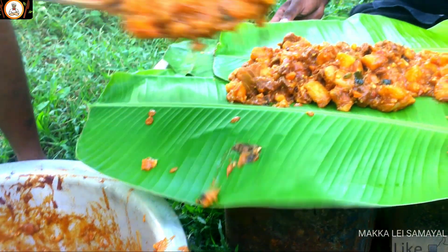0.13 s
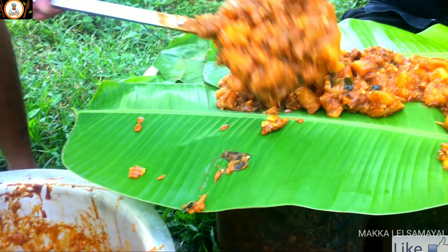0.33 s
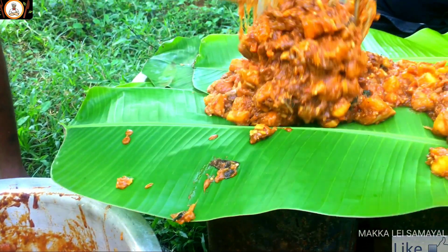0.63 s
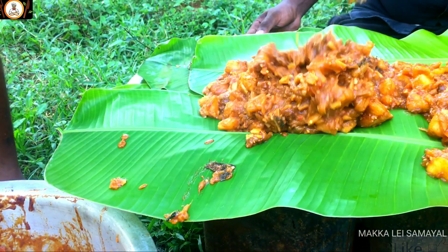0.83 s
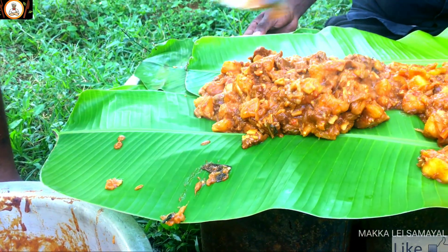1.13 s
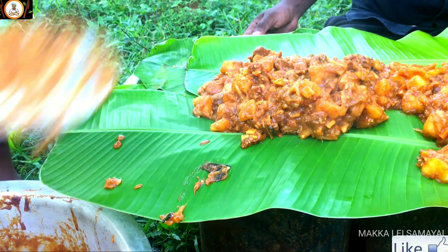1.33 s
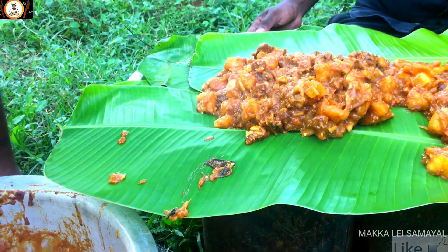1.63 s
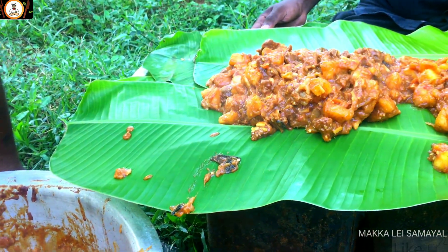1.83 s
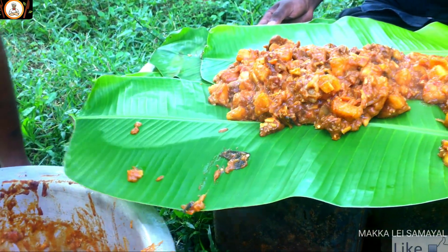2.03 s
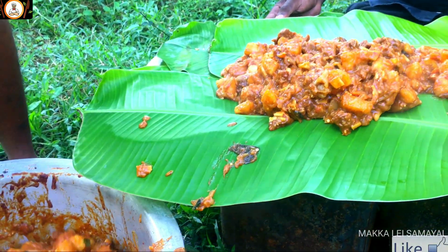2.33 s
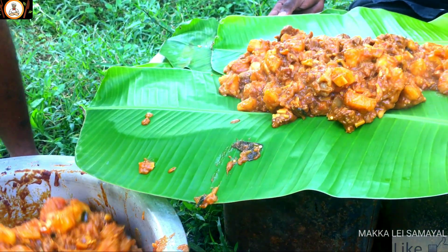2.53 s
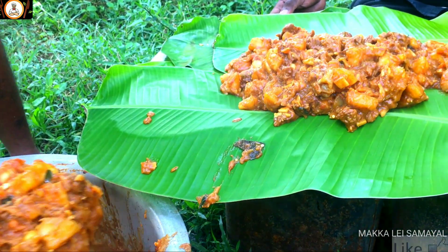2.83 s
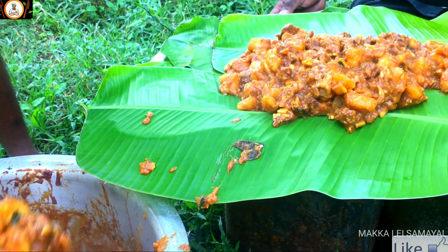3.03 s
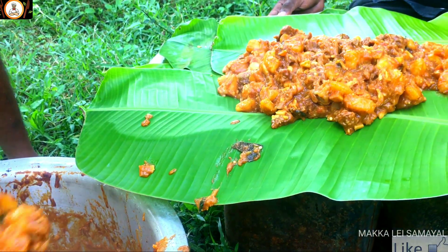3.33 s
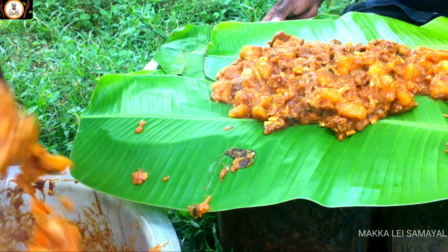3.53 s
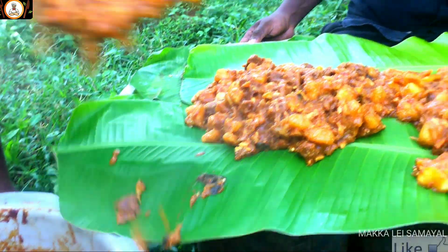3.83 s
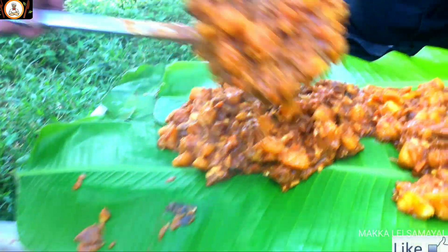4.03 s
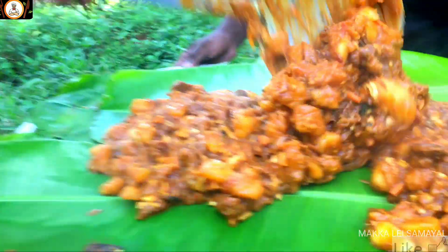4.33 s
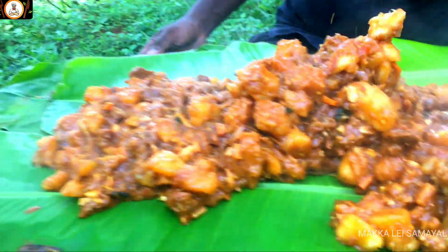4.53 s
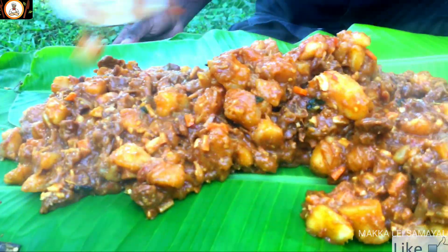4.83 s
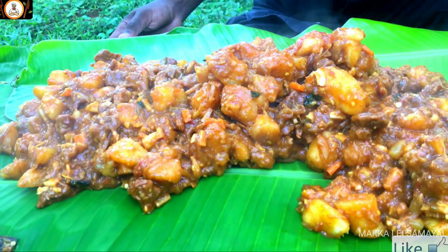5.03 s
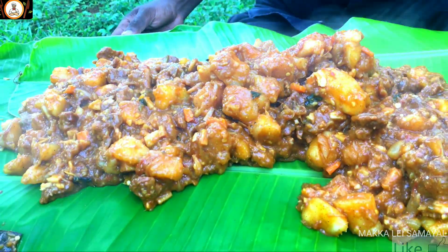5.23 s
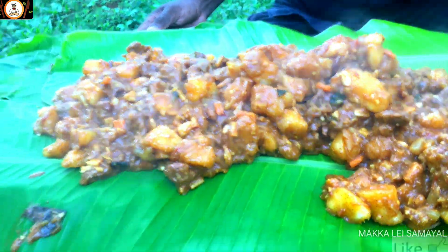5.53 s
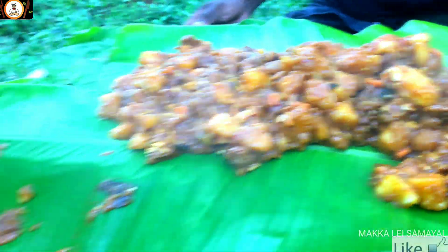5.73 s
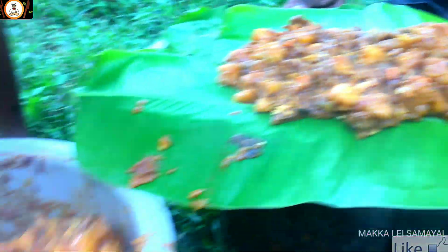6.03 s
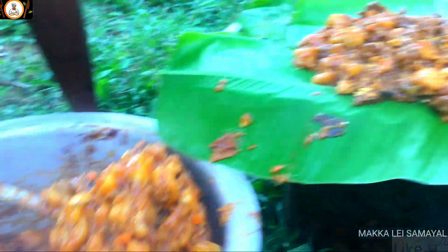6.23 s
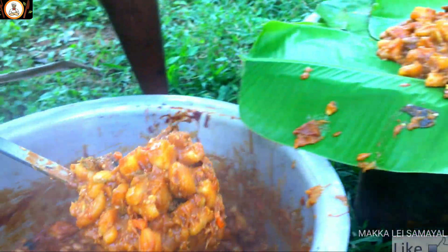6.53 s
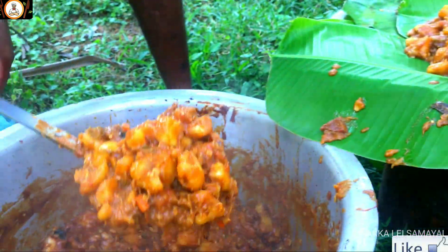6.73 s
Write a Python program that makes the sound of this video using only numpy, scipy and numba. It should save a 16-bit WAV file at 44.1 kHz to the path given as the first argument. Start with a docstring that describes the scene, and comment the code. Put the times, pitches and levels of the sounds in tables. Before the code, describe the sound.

A metal ladle digs into thick curry in a big aluminium pot with a short ringing scrape, ending in a loud, dull knock. The sticky food smacks and crackles quietly, then flops softly onto a leaf. A second, harsher scrape follows near the end, closing with a lighter knock. The sound is close and dry, outdoors, over a low rumble, a distant engine hum and a thin insect chirp.

```python
"""A long metal ladle digs twice through thick curry in a big aluminium pot, outdoors.
Each scoop is two pushes: the edge slips along the wall, ringing wall and bowl, and ends in a knock
that the food damps. The sticky mass smacks and crackles as films tear and bubbles burst, and flops
softly onto a leaf. Behind it: a low rumble, a far engine's hum and a thin insect note."""
import sys
import numpy as np
from scipy import signal
from scipy.fft import rfft, irfft, next_fast_len
from scipy.io import wavfile
from numba import njit

SR = 44100
rng = np.random.default_rng(int(sys.argv[2]) if len(sys.argv) > 2 else 0)


def log_audio(samples):
    """Write samples as a 16-bit WAV file to the path given in sys.argv[1]."""
    # one column per channel
    frames = np.atleast_2d(samples).T
    # limit to full scale, then quantise
    limited = np.clip(frames, -1, 1)
    pcm = np.round(limited * 32767).astype(np.int16)
    wavfile.write(sys.argv[1], SR, pcm)


N = 303849
TIME_S = np.arange(N) / SR

# open-air spectrum: (frequency [Hz], gain [dB])
AIR_SPECTRUM = [(15, -35.5), (25, -13.5), (55, -1), (153, -11), (195, -14.5), (256, -21), (405, -26.5),
                (695, -28), (1480, -32.5), (2280, -31), (2910, -37.5), (3160, -31.5), (4490, -36.5),
                (12500, -47), (16000, -62.5)]
# far engine's run: (time [s], firing rate [Hz], level [dB])
ENGINE_RUN = [(0, 27.8, -50.5), (1, 27.4, -51.5), (2.3, 25.66, -57), (3.1, 24.95, -51.5), (4, 23.8, -64),
              (4.7, 23.6, -51.5), (6.89, 25, -60.5)]
# engine lines: (multiple of the firing rate, gain [dB])
ENGINE_HARMONICS = [(2, 0.5), (3, -8.5), (4, -0.5), (5, -8), (6, -3.5), (7, -13)]
# lumps landing: (time [s], level [dB], upper edge [Hz], length [s])
LUMP_FLOPS = [(0.192, -47.5, 880, 0.044), (0.281, -50.5, 990, 0.033), (3.878, -40, 895, .035),
              (3.921, -38.5, 880, 0.016), (4.362, -49.5, 510, 0.011), (4.394, -44.5, 266, 0.063),
              (4.491, -48, 304, 0.048), (4.582, -50.5, 477, 0.059), (5.883, -47, 410, 0.065)]
# wet mass shifting: (peak time [s], crackle [dB], half length [s], sizzle [dB])
MASS_SHIFTS = [(.62, -65, .25, -78), (1.82, -61, .1, -81), (2.521, -55, .13, -71.5), (2.73, -56, .05, -56),
               (2.975, -58, .09, -70.5), (3.598, -66, .3, -81), (4.032, -59.5, .06, -66),
               (4.324, -60, .09, -68), (4.481, -56.5, .07, -57.5), (6.115, -57, .12, -78),
               (6.54, -57.5, .05, -77.5)]
# clearest air pockets bursting: (time [s], relative level [dB], centre [Hz])
POCKET_POPS = [(0.022, -36.5, 2040), (0.3362, -40.5, 2960), (0.48, -36.5, 1820), (.4906, -32, 1255),
               (.5137, -38.5, 7500), (0.734, -39.5, 8750), (0.7545, -36.5, 4860), (.857, -41.5, 3770),
               (1.382, -42.5, 3330), (2.345, -35, 12600), (2.5195, -34.5, 4180), (2.5462, -37.5, 5900),
               (2.623, -33, 3470), (2.6307, -32, 3340), (2.9554, -31.5, 3320), (3.324, -35.5, 3640),
               (3.393, -36.5, 2300), (3.544, -34, 4120), (5.559, -31.5, 1260), (5.931, -38, 4250),
               (6.1574, -31, 3750), (6.1833, -33, 2610), (6.238, -35.5, 6060), (6.2897, -35.5, 4350),
               (6.4807, -31.5, 4200), (6.551, -31, 1890), (6.7298, -37, 3550), (6.841, -37, 1810)]
# sticky smacks: (time [s], relative level [dB], nominal centre [Hz], t60 [s], relative low part [dB])
FILM_SMACKS = [(3.4448, -22.5, 2376, 0.02, -10), (3.4662, -23, 5730, 0.045, -1),
               (3.5672, -14.5, 4870, 0.037, -14), (3.6187, -20.5, 5830, 0.025, -21),
               (3.6239, -17.5, 2700, 0.027, -6), (3.7131, -24, 3900, 0.086, 5),
               (3.7239, -20.5, 7800, 0.053, 5.5), (3.8066, -20.5, 2100, 0.05, -11),
               (3.9235, -27.5, 3160, 0.09, -14)]
# loaded pot's modes: (frequency [Hz], gain [dB], t60 [s])
POT_MODES = [(254.8, -8.5, 0.094), (289, -4.5, 0.067), (410, -0.5, 0.03), (565, -1.5, 0.047),
             (780, -12, .04), (932, -12, .045), (1223, -13.5, 0.037), (1444, -18, 0.0401),
             (1920, -18.5, .035), (2335, -17, 0.027)]
# ladle hits: (time [s], level [dB], struck spot [Hz], spot t60 [s], whole pot [dB], crack [dB])
POT_KNOCKS = [(0.2705, -16, 1060, 0.0098, -22, -21.5), (0.2763, -27, 950, 0.013, -16.5, -11),
              (1.8498, -5.5, 1850, 0.0057, -19, -26), (1.8523, -19, 1790, 0.041, 2.5, -9),
              (2.283, 4.5, 582, 0.031, -13.5, -25.5), (2.334, -28, 565, 0.032, -15, -19),
              (3.249, -21.5, 270, 0.065, -18, -21), (3.2495, -29, 613, 0.033, -24, -36),
              (3.331, -39.5, 273, 0.11, -13, -31), (3.626, -41, 269, 0.12, -7, -20),
              (3.926, -29, 562, 0.056, -10, -13), (5.584, -24.5, 280, 0.054, -5, 1.5),
              (5.8632, -13.5, 265, 0.025, -0.5, -33), (6.2300, -48.5, 300, 0.047, 0, -23.5),
              (6.518, -34.5, 280, 0.12, -5.5, -27)]
# ladle edge's modes: (frequency [Hz], waver [Hz], gain [dB])
EDGE_MODES = [(3114, 196, 7.5), (4100, 134, 7.5)]
# edge catching: (time [s], level [dB], length [s])
EDGE_CATCHES = [(2.1638, -17.5, 0.0021), (5.672, -21, 0.0051), (5.731, -28, 0.01)]
# rubbing spectrum: (frequency [Hz], gain [dB])
RUB_SPECTRUM = [(88, -42), (150, -15), (205, -7.5), (275, 0.5), (361, -13.5), (649, 2.5), (1060, -14),
                (1190, -1), (1830, -2), (2020, -8), (2220, 0), (3220, -6), (14500, -26.5), (16000, -35.5)]
# wall modes under the ladle, per scoop: (frequency [Hz], width [Hz], gain [dB])
FIRST_WALL_MODES = [(668, 87, 2), (1122, 57, -7), (1820, 130, -6.5), (2476, 76, 0), (3062, 81, -4.5),
                    (3730, 84, -0.5), (4160, 180, 0.5), (5750, 600, -1.5), (6950, 99, -4.5),
                    (8500, 350, -11)]
SECOND_WALL_MODES = [(900, 180, 0), (1890, 88, -1), (2182, 39.4, 2), (2643, 35, -15), (3090, 180, 3),
                     (3454, 37, 8.5), (4380, 440, 2), (5210, 76, 2.5), (5570, 39, 3), (6110, 160, 1)]
# ladle pushes: (time [s], length [s], attack [s], release t60 [s], full-pressure grind [dB], swell [dB],
# treble [dB], bowl start [Hz], full-pressure bowl [Hz], bowl share [dB], scoop)
LADLE_PUSHES = [(1.907, 0.086, 0.081, 0.3, -30.5, 1, -42.5, 1240, 1190, -3.5, "first"),
                (2.018, 0.23, 0.044, 0.09, -27.5, 6, -42, 2016, 4440, -3, "first"),
                (5.576, 0.2307, 0.0065, 0.046, -22, 13.5, -38.5, 1200, 4530, -6, "second"),
                (5.834, .025, .007, 0.049, -24, 1, -46, 2960, 2170, -1.5, "second")]


def undb(db):
    """Decibels to gain."""
    return 10 ** (np.asarray(db) / 20)


def unit(x):
    """Scale to rms 1."""
    return x / np.sqrt(np.mean(x ** 2) + 1e-18)


def add(track, at_s, sound):
    """Mix a sound into the track."""
    start = max(int(at_s * SR), 0)
    track[start:start + len(sound)] += sound[:N - start]


def fade(t, t60_s):
    """Exponential decay, 60 dB down after t60_s."""
    return np.exp(-np.log(1000) * t / max(t60_s, .002))


def bump(at_s, half_s):
    """Gaussian swell peaking at at_s."""
    return np.exp(-((TIME_S - at_s) / half_s) ** 2)


def walk(rate_hz, size):
    """Random drift, spread near 1."""
    knots = np.arange(size) * rate_hz / SR
    return np.interp(knots, np.arange(4096), rng.standard_normal(4096))


def grains(size, rate_hz, spread_db):
    """Random clicks, a few much stronger than the rest."""
    fires = rng.random(size) < rate_hz / SR
    strength = np.minimum(rng.exponential(size=size), 4)
    return fires * rng.choice([-1, 1], size) * undb(spread_db * strength)


def band(x, hz, width_hz):
    """One resonance, gain 1 at its centre."""
    hz = min(hz, .42 * SR)
    return signal.lfilter(*signal.iirpeak(hz, hz / min(width_hz, SR / 3), fs=SR), x)


@njit
def glide(x, hz, width_hz):
    """Resonance with per-sample centre and width."""
    y, state, low = np.empty(len(x)), 0., 0.
    for i in range(len(x)):
        g = np.tan(np.pi * min(hz[i] / SR, .45))
        damping = width_hz[i] / hz[i]
        ring = (state + g * (x[i] - low)) / (1 + g * (g + damping))
        state, low = 2 * ring - state, low + 2 * g * ring
        y[i] = damping * ring
    return y


def between(x, low_hz, high_hz, order=2):
    """Band-pass between two edges."""
    return signal.sosfilt(signal.butter(order, [low_hz, high_hz], "band", fs=SR, output="sos"), x)


def colour(x, spectrum):
    """Filter by a table of (frequency [Hz], gain [dB])."""
    hz, db = np.transpose(spectrum)
    size = next_fast_len(len(x))
    bins_hz = np.maximum(np.arange(size // 2 + 1) * SR / size, 1)
    gain = undb(np.interp(np.log(bins_hz), np.log(hz), db))
    return irfft(rfft(x, size) * gain, size)[:len(x)]


def split(x):
    """Body, middle and treble, in phase, each at rms 1."""
    body, below = (signal.sosfiltfilt(signal.butter(3, hz, fs=SR, output="sos"), x)
                   for hz in (1000, 7000))
    return unit(body), unit(below - body), unit(x - below)


def open_air(level_db=-50, lull_s=5.27, lull_db=-6.5):
    """Distant hiss over a rumble that ebbs once."""
    air = unit(colour(rng.standard_normal(N), AIR_SPECTRUM)) * undb(level_db)
    air = signal.sosfilt(signal.butter(4, 35, "high", fs=SR, output="sos"), air)
    rumble = signal.sosfiltfilt(signal.butter(2, 220, fs=SR, output="sos"), air)
    hiss = air - rumble
    return hiss + rumble * undb(-.05 + lull_db * bump(lull_s, half_s=.5))


def engine():
    """A far engine hums on low harmonics, each wavering by itself."""
    times_s, firing_hz, level_db = np.transpose(ENGINE_RUN)
    phase = 2 * np.pi * np.cumsum(np.interp(TIME_S, times_s, firing_hz)) / SR
    hum = sum(undb(db + 4.2 * walk(2.1, N)) * np.sin(k * phase + .5 * walk(2.5, N))
              for k, db in ENGINE_HARMONICS)
    return unit(hum) * undb(np.interp(TIME_S, times_s, level_db))


def insect(hz=3150, width_hz=130, period_s=.358, jitter_s=.015, chirp_db=-67, trill_db=-81):
    """A far insect: brief, near-even chirps over a faint trill."""
    note = unit(band(band(rng.standard_normal(N), hz, width_hz), hz, width_hz))
    times_s = np.arange(.235, N / SR, period_s)
    scatter = rng.standard_normal((len(times_s), 2))
    chirps = sum(undb(chirp_db + 2 * loud) * bump(at_s + jitter_s * late, half_s=.024)
                 for at_s, (loud, late) in zip(times_s, scatter))
    return note * (chirps + undb(trill_db + 5 * walk(9, N)))


def flops():
    """Soft lumps land: a dull patter swells and dies."""
    out, t = np.zeros(N), np.arange(SR // 3) / SR
    for at_s, db, edge_hz, length_s in LUMP_FLOPS:
        age = 3 * t / length_s
        patter = unit(between(grains(len(t), 2500, 2.8), 97, edge_hz))
        add(out, at_s, undb(db) * patter * age * np.exp(1 - age))
    return out


def unrest(rest_db=-70):
    """Food motion as a gain: the hot mass never quite settles and swells at each shift."""
    shift_power = sum((undb(db) * bump(at_s, half_s)) ** 2 for at_s, db, half_s, _ in MASS_SHIFTS)
    return np.sqrt(undb(rest_db) ** 2 + shift_power)


def fizz(mist_db=-4):
    """Tiny bubbles burst over a wet hiss; gravy sizzles as it peels off the metal."""
    bubbles = sum(unit(band(grains(N, 30, 4.2), hz, .14 * hz)) for hz in np.geomspace(1800, 12500, 12))
    mist = unit(between(grains(N, 4000, 2.2), 2100, 12000, order=1))
    peeling = sum(undb(db) * bump(at_s, half_s) for at_s, _, half_s, db in MASS_SHIFTS)
    sizzle = unit(between(grains(N, 2500, 2), 9500, 17000)) * peeling
    return (unit(bubbles) + undb(mist_db) * mist) * unrest() + sizzle


def tear(size, snap_db):
    """A sticky film gives way: one snap, then tiny clicks."""
    clicks = unit(grains(size, 7000, 2.8))
    clicks[0] += undb(snap_db)
    return clicks


def faint_pops(rate_hz=3, db=-40, centre_hz=3800):
    """Random rows like POCKET_POPS, crowding where the food moves."""
    moved = np.cumsum(unrest() ** 2)
    draws = rng.random((int(rate_hz * N / SR), 3))
    return [(np.interp(when, moved / moved[-1], TIME_S),
             db + 3 * (2 * loud - 1),
             centre_hz * 2 ** (2 * pitch - 1)) for when, loud, pitch in draws]


def pops(gain_db=-10, spray_db=-9, t60_s=.03):
    """Air pockets burst in the gravy and ring briefly."""
    out, t = np.zeros(N), np.arange(SR // 10) / SR
    for at_s, db, hz in POCKET_POPS + faint_pops():
        clicks = tear(len(t), snap_db=18)
        pocket = unit(band(clicks, hz, .25 * hz))
        spray = undb(spray_db) * unit(between(clicks, 2200, 17000, order=1))
        add(out, at_s, undb(db + gain_db) * (pocket + spray) * fade(t, t60_s))
    return out


def pot_ring(x):
    """The pot's modes, driven by x."""
    return sum(undb(db) * band(x, hz, np.log(1000) / np.pi / t60_s) for hz, db, t60_s in POT_MODES)


def smacks(gain_db=-12, low_gain_db=-5, spray_db=-15, fall_s=.0058):
    """Sticky films tear; each opens an air pocket whose pitch drops as it widens."""
    out, t = np.zeros(N), np.arange(SR // 10) / SR
    pitch_ratio = .61 + .41 * np.exp(-t / fall_s)
    for at_s, db, hz, t60_s, low_db in FILM_SMACKS:
        clicks = tear(len(t), snap_db=7)
        pocket_hz = hz * pitch_ratio
        pocket = unit(glide(clicks, pocket_hz, .42 * pocket_hz))
        low = undb(low_db + low_gain_db) * unit(between(clicks, 390, 1700, order=1) + pot_ring(clicks))
        spray = undb(spray_db) * unit(between(clicks, 5750, 19000, order=1))
        add(out, at_s, undb(db + gain_db) * (pocket + low + spray) * fade(t, t60_s))
    return out


def knocks(contact_s=.0005, crack_t60_s=.022, tail_db=-36, tail_t60_s=.22):
    """The ladle hits the pot: the struck spot rings, the whole pot thuds, the metal cracks."""
    out, t = np.zeros(N), np.arange(SR // 3) / SR
    cushion = 1 - np.exp(-t / contact_s)  # gravy film softens the blow
    for at_s, db, spot_hz, spot_t60_s, pot_db, crack_db in POT_KNOCKS:
        spot = np.sin(2 * np.pi * spot_hz * t) * fade(t, spot_t60_s)
        thud = sum(undb(mode_db) * np.sin(2 * np.pi * hz * (1 + .016 * rng.standard_normal()) * t)
                   * fade(t, t60_s) for hz, mode_db, t60_s in POT_MODES)
        crack = unit(band(band(rng.standard_normal(len(t)), 1391, 2600), 1800, 4290))
        crack *= fade(t, crack_t60_s)
        tail = unit(between(rng.standard_normal(len(t)), 170, 650)) * fade(t, tail_t60_s)
        ring = spot + undb(pot_db) * thud + undb(tail_db) * tail
        add(out, at_s, undb(db) * (cushion * ring + undb(crack_db) * crack))
    # little radiation below the lowest mode
    return signal.sosfilt(signal.butter(5, 175, "high", fs=SR, output="sos"), out)


def wall_ring(slips, modes):
    """Wall modes swell as the edge crosses their nodes and drift as the food shifts."""
    size = len(slips)
    ring = np.zeros(size)
    for hz, width_hz, db in modes:
        swell = undb(db + 4 * walk(30, size))
        drifting_hz = hz * (1 + .025 * walk(25, size))
        ring += swell * glide(slips, drifting_hz, np.full(size, float(width_hz)))
    return unit(ring + undb(.5) * band(slips, 295, 45))


def rubbing(slips, t, shimmer_db=-2, rim_gain=.524):
    """Slips, the shimmer of the thin metal's many weak modes, and a bending wave back from the rim."""
    shimmer = signal.fftconvolve(slips, rng.standard_normal(len(t)) * fade(t, .05))[:len(t)]
    rub = colour(unit(slips) + undb(shimmer_db) * unit(shimmer), RUB_SPECTRUM)
    rim_delay_s = np.linspace(.0024, .0014, len(t))  # shortens as the contact climbs
    return unit(rub + rim_gain * np.interp(t - rim_delay_s, t, rub))


def scrape(push, wall_modes, ring_db, slip_rate_hz=5000, grit_db=2.8, body_db=-37.5):
    """Dense edge slips ring wall and bowl; rising pressure swells the grind and retunes the bowl."""
    length_s, attack_s, release_s, grind_db, swell_db, treble_db, from_hz, to_hz, bowl_db = push
    t = np.arange(0, length_s + release_s, 1 / SR)
    onset = np.sin(np.pi / 2 * np.minimum(t / attack_s, 1)) ** 2
    contact = onset * fade(np.maximum(t - length_s, 0), release_s)
    pressure = 1 - np.exp(-t / (.34 * length_s))
    slips = grains(len(t), slip_rate_hz, grit_db) * undb(1.7 * walk(160, len(t)))
    body, middle, treble = split(undb(ring_db) * wall_ring(slips, wall_modes) + rubbing(slips, t))
    bowl_hz = from_hz * (to_hz / from_hz) ** pressure * (1 + .04 * walk(90, len(t)))
    bowl_slips = grains(len(t), slip_rate_hz, grit_db)
    bowl = unit(glide(bowl_slips, bowl_hz, .12 * bowl_hz) / np.sqrt(bowl_hz))
    share = undb(bowl_db)
    grind = (middle + share * bowl) / np.hypot(1, share) * undb(grind_db - swell_db * (1 - pressure))
    # light contact is dull: body first in, last out
    return (body * undb(body_db) * np.sqrt(contact) + grind * contact
            + treble * undb(treble_db) * contact ** 1.25)


def edge_catch(length_s, t60_s=.033):
    """The edge catches: its modes start at once and hold while it judders."""
    t = np.arange(SR // 25) / SR
    hold = fade(np.maximum(t - length_s, 0), t60_s) * undb(1.2 * walk(770, len(t)))
    judder = sum(undb(db) * np.sin(2 * np.pi * np.cumsum(hz + waver_hz * walk(600, len(t))) / SR)
                 for hz, waver_hz, db in EDGE_MODES)
    return unit(judder) * hold


def ladle(first_ring_db=.5, second_ring_db=3, pot_db=-5):
    """Two scoops of two pushes, with catches; the pot rings on faintly."""
    out = np.zeros(N)
    walls = {"first": (FIRST_WALL_MODES, first_ring_db), "second": (SECOND_WALL_MODES, second_ring_db)}
    for at_s, *push, scoop in LADLE_PUSHES:
        add(out, at_s, scrape(push, *walls[scoop]))
    for at_s, db, length_s in EDGE_CATCHES:
        add(out, at_s, undb(db) * edge_catch(length_s))
    return out + undb(pot_db) * pot_ring(out)


def scene():
    """Mono mix, no echo."""
    pot_and_food = ladle() + knocks() + smacks() + pops() + fizz() + flops()
    background = engine() + insect() + open_air()
    return (pot_and_food + background)[None]


def record(dry):
    """The hardest knock overloads the microphone; the top is cut."""
    ceiling, top_hz = .73, 15800
    clipped = np.clip(dry, -ceiling, ceiling)
    return signal.sosfilt(signal.ellip(8, .2, 70, top_hz, fs=SR, output="sos"), clipped)


dry = scene()
out = record(dry)
log_audio(out)
```